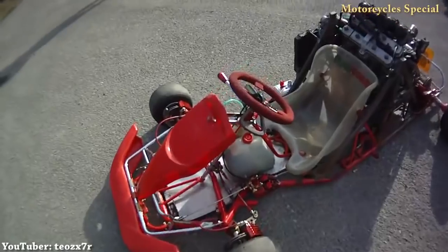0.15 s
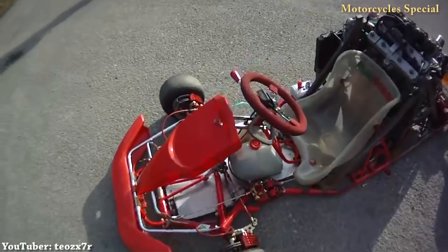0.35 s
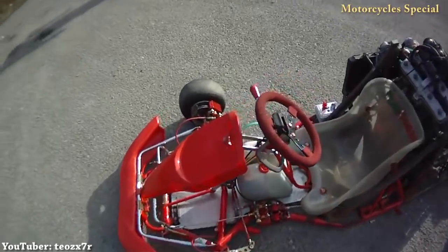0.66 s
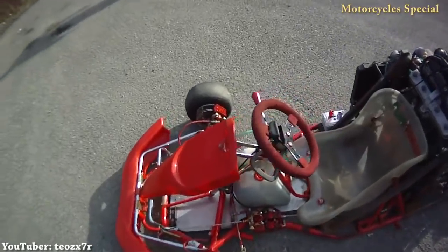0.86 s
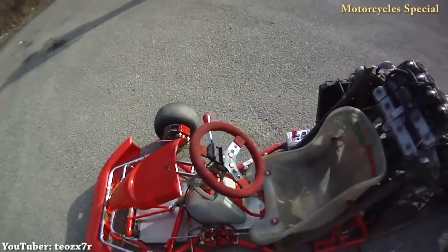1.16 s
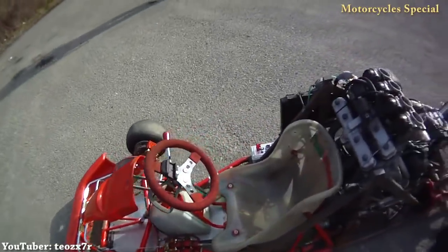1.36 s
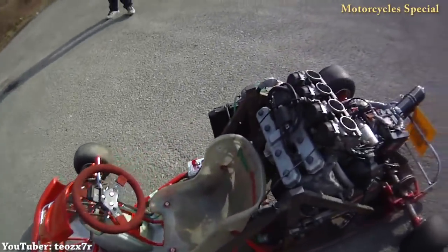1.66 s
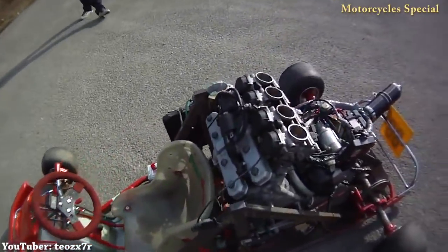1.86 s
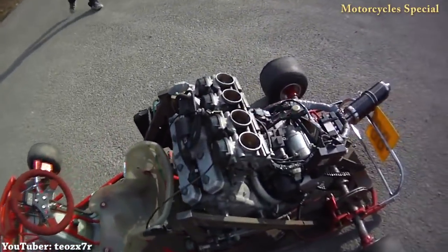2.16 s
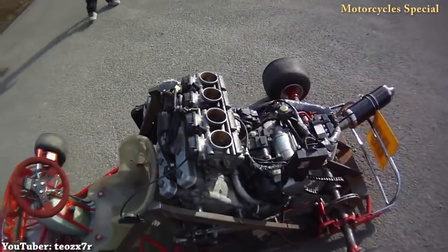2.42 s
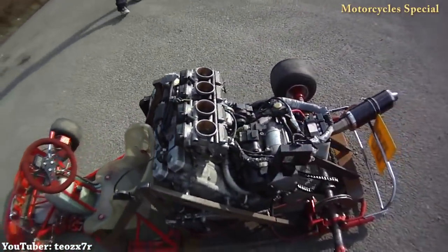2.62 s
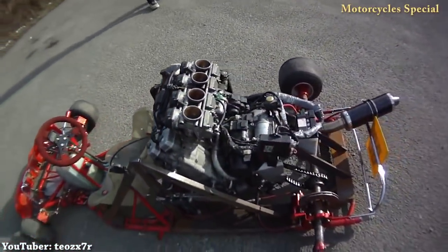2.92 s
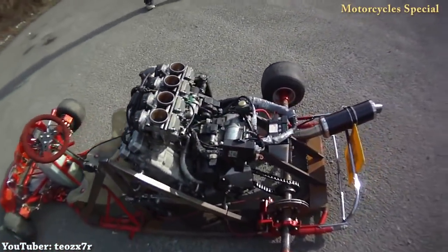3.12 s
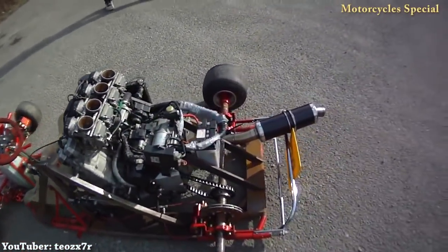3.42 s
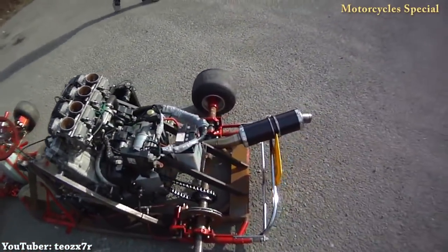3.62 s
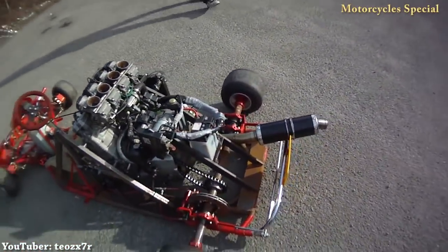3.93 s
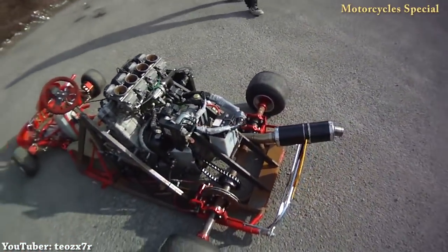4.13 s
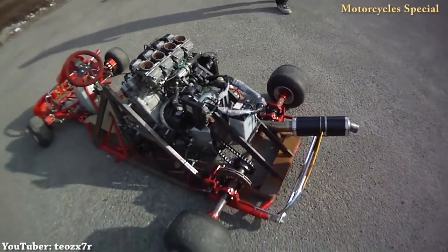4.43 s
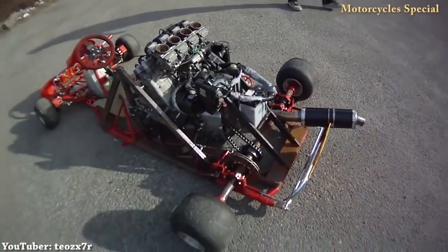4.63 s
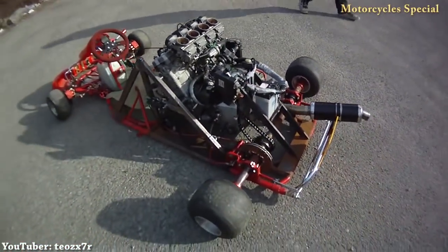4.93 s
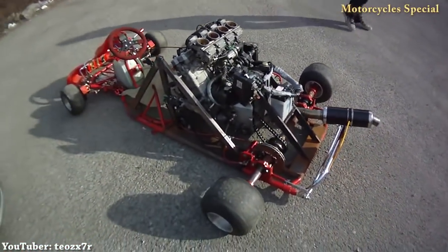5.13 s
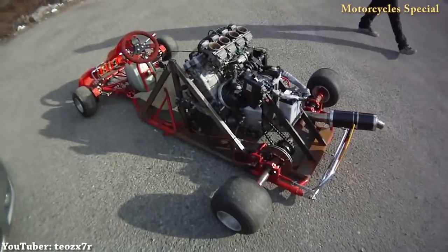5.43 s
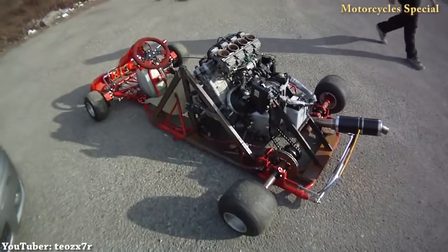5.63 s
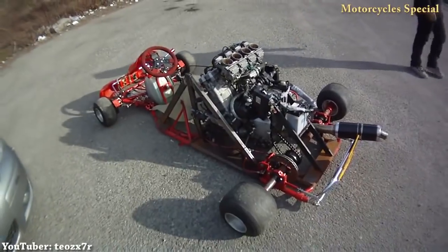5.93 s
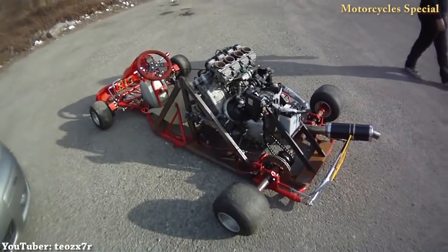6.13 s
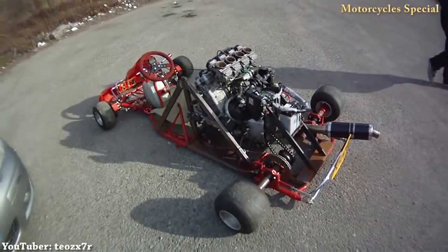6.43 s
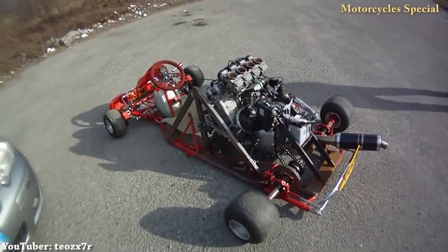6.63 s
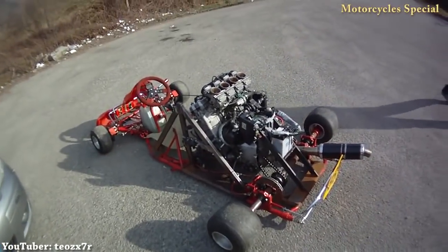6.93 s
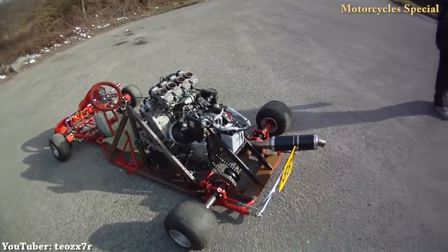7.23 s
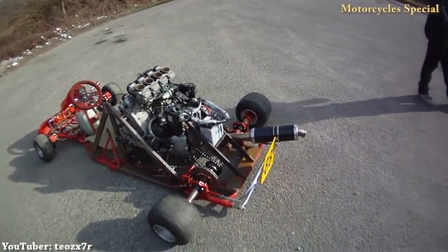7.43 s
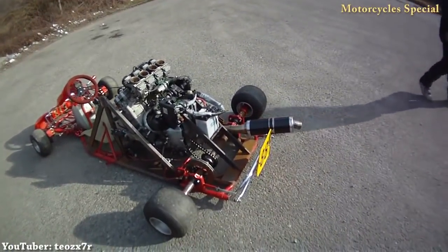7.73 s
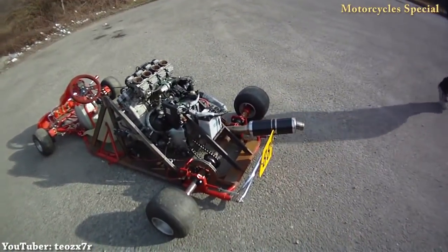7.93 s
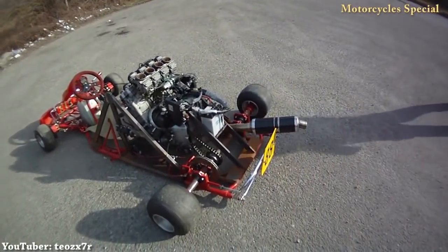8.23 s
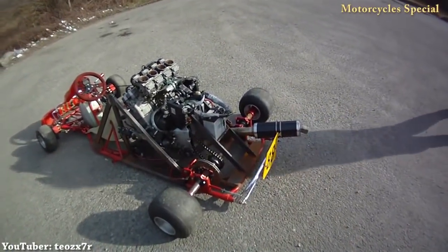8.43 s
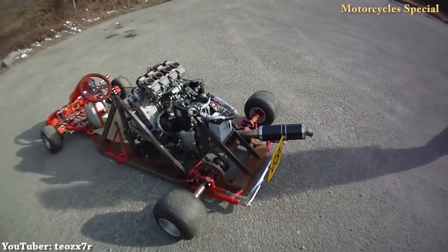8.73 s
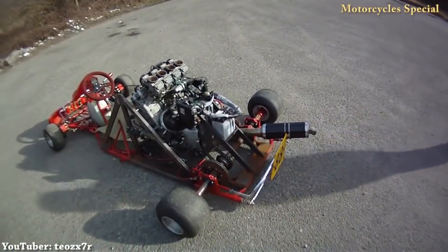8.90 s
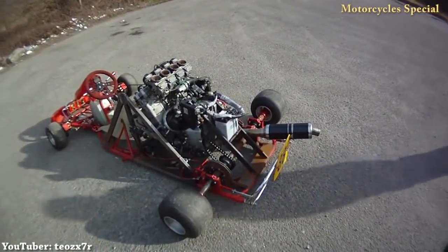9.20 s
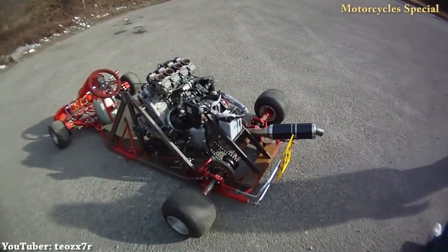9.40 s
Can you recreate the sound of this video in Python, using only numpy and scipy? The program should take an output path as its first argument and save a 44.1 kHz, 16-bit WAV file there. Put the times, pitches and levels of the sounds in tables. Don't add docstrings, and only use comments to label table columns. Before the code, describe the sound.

Rough, lumpy idle of a bare four-cylinder engine, low honking exhaust pulses under clattering cases and thin whines, heard while walking around it.

```python
import sys
import numpy as np
from scipy import signal
from scipy.fft import rfft, irfft, next_fast_len
from scipy.io import wavfile
from scipy.ndimage import uniform_filter1d

SR = 44100
rng = np.random.default_rng(int(sys.argv[2]) if len(sys.argv) > 2 else 0)


def unload_wav(signal):
    wavfile.write(
        sys.argv[1],
        SR,
        np.round(np.clip(np.atleast_2d(signal).T, -1, 1) * 32767).astype(np.int16),
    )


def boost_factor(decibels):
    exponent = np.asarray(decibels, float) / 20
    return 10 ** exponent


N = 421596
T = np.arange(N) / SR


def evened(x):
    return x / np.sqrt(np.mean(x ** 2) + 1e-20)


def coloured(x, points):
    size = next_fast_len(N)
    f_hz, db = np.transpose(points)
    log_f = np.log(np.fft.rfftfreq(size, 1 / SR) + 1)
    gain = boost_factor(np.interp(log_f, np.log(f_hz), db, -90, -90))
    return evened(irfft(rfft(x, size) * gain, size)[:N])


def resonate(x, hz, width_hz):
    turn = np.exp(2j * np.pi * np.cumsum(hz * np.ones(len(x))) / SR)
    r = np.exp(-np.pi * width_hz / SR)
    return 2 * (turn * signal.lfilter([1 - r], [1, -r], x / turn)).real


def drift(rate_hz):
    count = int(N / SR * rate_hz) + 2
    return evened(np.interp(T, np.linspace(0, N / SR, count), rng.standard_normal(count)))


def clicks(moments, sizes):
    train = np.zeros(N + SR)
    np.add.at(train, np.round((moments + .1) * SR).astype(int), sizes)
    return train


def whine(speed, multiple, width_hz, size=N):
    hz = multiple * speed
    once = resonate(rng.standard_normal(size), hz, width_hz)
    return evened(resonate(once, hz, width_hz))


# t/s, distance/m, bearing/deg (0 nose, 90 beside, 180 tail)
WALK = [(0, 1.71, 29.4), (.7, 1.52, 41.6), (1.2, 1.33, 46), (1.7, 1.24, 67.5), (2.2, 1.21, 72.3),
        (2.8, 1.13, 84.5), (3.3, 1.15, 90.6), (3.8, 1.19, 105), (4.2, 1.34, 116), (4.85, 1.47, 143.6),
        (5.5, 1.75, 147), (5.9, 1.8, 155), (6.3, 2.13, 151), (6.7, 1.97, 162), (7.7, 1.94, 186),
        (8.6, 2.15, 165), (9.3, 2.16, 147), (9.56, 2.2, 156)]


def walk(t):
    s, metres, bearing = np.transpose(WALK)
    return np.interp(t, s, metres), np.interp(t, s, bearing)


def heard(beam):
    db, dip_db, facing, spacing = beam
    t = T[::1000]
    metres, bearing = walk(t)
    off = (bearing - facing) / spacing
    return np.interp(T, t, db - 20 * np.log10(metres) - dip_db * np.sin(np.pi * off) ** 2)


FRONT_ENDS, BEHIND_STARTS = (37, 73.6), (86, 153)


def past(bearings):
    start, end = bearings
    return np.clip((walk(T)[1] - start) / (end - start), 0, 1)


# f/Hz, density/dB
YARD_COLOUR = [(12, -42), (20, -33), (161, -36), (215, -1), (277, 6), (387, 11), (440, -69), (900, -51),
               (1170, -59), (1980, -120)]
# t/s, length/s, level/dB, f/Hz, bandwidth/Hz
SCUFFS = [
    (.35, .09, -39, 60, 120),
    (.355, .05, -50, 1170, 90),
    (6.98, .18, -52, 1750, 800),
    (7.095, .1, -35, 380, 80),
    (7.095, .1, -36, 505, 60),
    (6.25, .05, -63, 9500, 2500),
]


def yard():
    out = boost_factor(-51) * coloured(rng.standard_normal(N), YARD_COLOUR)
    for s, length_s, db, hz, width_hz in SCUFFS:
        size = round(length_s * SR)
        noise = rng.standard_normal(12000)
        rub = resonate(resonate(noise, hz, width_hz), hz, width_hz)[:size]
        out[round(s * SR):][:size] += boost_factor(db) * evened(rub) * np.hanning(size)
    return out


# t/s, length/s, from f/Hz, to f/Hz, level/dB
CHIRPS = [
    (1.385, 0.26, 3800, 4220, -45.5),
    (3.548, 0.26, 4270, 4280, -47.5),
]


def chain_guide():
    out = np.zeros(N)
    for s, length_s, from_hz, to_hz, db in CHIRPS:
        along = np.clip(T[:SR // 2] / length_s, 0, 1)
        hz = from_hz + (to_hz - from_hz) * along
        line = whine(1, hz, 60, size=len(along))
        out[round(s * SR):][:len(along)] += boost_factor(db) * np.sin(np.pi * along) * line
    return out


# level at 1 m/dB, dip between lobes/dB, lobe bearing/deg, lobe spacing/deg
BRACKET_BEAM = (-48, 3.5, 35, 302)


def bracket(turns, speed):
    luck = boost_factor(2 * rng.standard_normal(200))[((turns - 1.4) // 4 + 2).astype(int)]
    swell = .25 + luck * (.5 + .5 * np.cos(np.pi / 2 * (turns - 3.4))) ** 2
    pump = boost_factor(-9) * whine(speed, 18.5, 22)
    buzz = evened(whine(1, 1145, 75) * swell) + pump
    return boost_factor(heard(BRACKET_BEAM) - 8.5) * buzz


# t/s, peak level/dB
CLACKS = [
    (2.06, -31),
    (2.132, -28),
    (2.205, -36),
    (2.501, -31),
    (2.644, -25),
    (4.901, -33),
]


def clacks():
    out = np.zeros(N)
    t = T[:300]
    for s, db in CLACKS:
        out[round(s * SR):][:len(t)] += boost_factor(db - 60 * t / .005) * np.sin(2 * np.pi * 1250 * t)
    return out


def patchy(x, db):
    z = signal.stft(x, nperseg=512)[2]
    field = rng.standard_normal(z.shape)
    for _ in range(2):
        field = uniform_filter1d(field, size=3, axis=0)
        field = uniform_filter1d(field, size=70, axis=1)
    return signal.istft(z * boost_factor(db * evened(field)), nperseg=512)[1][:N]


# f/Hz, density/dB
FRONT = [(330, 10), (560, -4), (766, -4), (914, -17.5), (1150, -7.5), (1410, -11), (1910, -22), (2340, -5),
         (2610, -7), (2750, -9.5), (3670, 1.5), (5080, -15.5), (13200, -27.5), (13900, -45), (14500, -58)]
BESIDE = [(330, 17.5), (560, -3), (878, -25), (1150, -13), (1510, -16), (2340, -0.5), (2610, -13.5),
          (2830, -4.5), (3620, -2), (4140, -2.5), (5370, -18.5), (6410, -13.5), (10000, -28), (11500, -25),
          (14500, -31)]
BEHIND = [(330, -4), (560, 0), (902, -17.5), (1030, -15), (1640, -19), (2370, -1.5), (2680, -12),
          (2910, -6), (4090, -4), (5370, -27.5), (6580, -15), (7650, -30.5), (11700, -31), (13700, -33),
          (14500, -59)]


def case_rattle(front, behind):
    noise = rng.standard_normal((3, N))
    later = np.sqrt(1 - behind) * coloured(noise[0], BESIDE) + np.sqrt(behind) * coloured(noise[1], BEHIND)
    return patchy(np.sqrt(front) * coloured(noise[2], FRONT) + np.sqrt(1 - front) * later, 1.9)


# f/Hz, level/dB
TICK_COLOUR = [(4500, -2), (5400, -7), (6400, 5), (7400, -10.5), (8300, -5.5), (10200, -18.5), (11500, -10),
               (14000, -42)]
# place in cycle/firings, level/dB
VALVES = [
    (.72, 7),
    (1.72, 0),
    (2.72, 6.5),
    (3.72, 3),
]


def valve_ticks(turns):
    cycle = (turns // 4 + 2).astype(int)
    luck = boost_factor(1.6 * rng.standard_normal((200, len(VALVES))))[cycle]
    shut = 0
    for k, (at, db) in enumerate(VALVES):
        shut = shut + boost_factor(db) * luck[:, k] * np.exp(-((turns - at) % 4) / 0.42)
    return evened(coloured(rng.standard_normal(N), TICK_COLOUR) * uniform_filter1d(shut, size=260))


TEETH = [37, 39.5, 41.5, 46, 55.5, 58, 61, 68, 71.5, 74, 77.5]


def teeth(turns):
    waver = 1.55 * np.sin(np.pi / 2 * turns)
    spin = uniform_filter1d(turns, size=1500)
    out = 0
    for order in TEETH:
        level = boost_factor(2.2 * drift(5) + 3.0 * drift(30))
        out = out + level * np.sin(2 * np.pi * order * spin + waver + 2.5 * drift(40))
    return evened(out)


# multiple of firing rate, bandwidth/Hz
WHINES = [
    (51.8, 45),
    (64.8, 62),
]
# level at 1 m/dB, dip between lobes/dB, lobe bearing/deg, lobe spacing/deg
METAL_BEAMS = [
    (-34, 2.15, 116, 260),
    (-47.5, 3.7, 190, 230),
    (-39, 20, 75.6, 121),
    (-39, 3, 74, 250),
    (-40, 7.2, 70, 90),
]


def metal(turns, speed, moments, loss_db):
    rattle_db, tick_db, cover_db, low_db, high_db = map(heard, METAL_BEAMS)
    shove = boost_factor(0.08 * np.interp(T, moments, loss_db) + 0.67 * drift(25))
    behind = .05 + .85 * past(BEHIND_STARTS)
    front = .9 * (1 - past(FRONT_ENDS))
    rattle = case_rattle(front, behind)
    half = 1 + .6 * np.cos(np.pi / 2 * (turns - 3.3))
    throb = resonate(rattle, 2250 + 110 * np.sin(np.pi / 2 * turns), 420)
    rattle = rattle + (half ** 1.1 - 1) * throb
    cover = evened(whine(1, 2398, 35) * half ** .6)
    low, high = (whine(speed, *mesh) for mesh in WHINES)
    out = boost_factor(rattle_db - 2.0) * rattle * half ** 0.022
    out += boost_factor(tick_db - 2.5 - 5.2 * front) * valve_ticks(turns)
    out += boost_factor(cover_db - 6.5) * cover
    out += boost_factor(rattle_db - 13.0) * teeth(turns)
    out += boost_factor(low_db - 9.5 + 1.4 * drift(9)) * low
    out += boost_factor(high_db - 2.5 - 3.6 * behind) * high
    return shove * out


# t/s, speed/(firings/s)
SPEED = [(0.0, 55.116), (0.89, 53.646), (1.09, 55.888), (2.04, 55.545), (2.23, 54.115), (3.09, 55.472),
         (3.28, 56.832), (3.72, 55.268), (3.92, 56.349), (5.23, 55.944), (5.47, 53.318), (5.81, 55.469),
         (6.31, 53.687), (7.73, 55.759), (7.91, 57.505), (8.96, 54.574), (9.15, 56.683), (9.56, 54.141)]
# first t/s, last t/s, first
# loss/dB, last loss/dB
STUMBLES = [(0.134, 0.134, -25, -25), (0.355, 0.355, -8, -8), (0.647, 0.946, -12, -5),
            (0.964, 0.964, -9, -9), (1.234, 1.376, -13, -17), (1.593, 1.88, -19, -9),
            (1.809, 1.952, -14, -16), (2.096, 2.242, -7, -15), (2.391, 2.537, -7, -20),
            (2.755, 2.901, -17, -6), (3.046, 3.046, -15, -15), (3.278, 3.278, -13, -13),
            (3.331, 3.473, -10, -6.6), (3.616, 3.904, -15, -8), (4.046, 4.188, -17, -23),
            (4.329, 4.615, -14, -6), (4.9, 5.329, -7, -34), (5.626, 5.626, -23, -23),
            (5.644, 5.644, -15, -15), (5.773, 6.062, -7, -17), (6.284, 6.284, -15, -15),
            (6.581, 6.581, -14, -14), (6.949, 7.24, -13, -9), (7.386, 7.386, -28, -28),
            (7.602, 7.602, -24, -24), (8.026, 8.168, -14, -13), (8.114, 8.114, -9, -9),
            (8.539, 8.539, -11, -11), (8.664, 8.811, -8, -13), (9.102, 9.388, -8, -9)]


def crank():
    lead = SR // 10
    turns_at_start, lean_db, carry = -1.396, 0.98, 0.065
    sag_rate, recover_s, wander_rate = 3.2, 0.066, 0.386
    t = np.arange(-lead, N + lead) / SR
    turns = np.cumsum(np.interp(t, *np.transpose(SPEED))) / SR
    turns = turns - turns[lead] + turns_at_start
    firing = np.arange(-4, int(turns[-1]))
    moments = np.interp(firing, turns, t)
    loss_db = -lean_db * rng.exponential(1, len(firing)) * (firing % 4 == 2)
    for first_s, last_s, first_db, last_db in STUMBLES:
        first, last = np.argmin(abs(moments - first_s)), np.argmin(abs(moments - last_s))
        run = np.arange(first, last + 1, 8)
        loss_db[run] = np.linspace(first_db, last_db, len(run))
    loss_db = np.minimum(loss_db, carry * np.roll(loss_db, 1))
    lost = clicks(moments, 1 - boost_factor(loss_db))[:len(t)]
    sag = sag_rate * signal.lfilter([1], [1, -np.exp(-1 / (recover_s * SR))], lost)
    sag = sag + wander_rate * np.interp(t, T, drift(12))
    turns = turns - np.cumsum(sag - uniform_filter1d(sag, size=SR // 3)) / SR
    moments = np.interp(firing, turns, t)
    return turns[lead:][:N], firing, moments, loss_db


CYLINDER_DB = [-0.2, 0.19, -0.59, 0.34]
# f/Hz, bandwidth/Hz, share of a firing's loss, level/dB, row of PIPE_BEAMS
PIPES = [
    (82, 56.6, 0.35, -2.5, 0),
    (154.5, 122.5, 0.79, 2, 0),
    (306.4, 206.4, 0.57, -7, 1),
    (281, 118.6, 1.54, -6, 1),
    (364, 160, 1, -6.5, 2),
    (520, 52.5, 3.2, -3, 3),
    (602, 81, 0.88, -18, 4),
]
RISE = [1.7, 1.6, 1.35, .45, 1.3, 1.2, 1.2]
# level at 1 m/dB, dip between lobes/dB, lobe bearing/deg, lobe spacing/deg
PIPE_BEAMS = [
    (-32.5, 8.5, 204, 360),
    (-21.5, 9, 39, 323),
    (-31.5, 12.5, 77, 106.5),
    (-40, 22, 66.6, 73),
    (-33.5, 11.5, 149, 160),
]


def pipes(firing, moments, loss_db):
    chance = rng.standard_normal((len(firing), 9))
    habit_db = np.array(CYLINDER_DB)[firing % 4]
    t, out = T[:3000], 0
    for k, (hz, width_hz, share, db, row) in enumerate(PIPES):
        rise_s = RISE[k] * 2 / (np.pi * width_hz)
        size_db = habit_db + share * loss_db + 0.62 * chance[:, 0] + .5 * chance[:, 2 + k]
        start = moments - rise_s + .00004 * chance[:, 1]
        ring = -t ** 2 * np.exp(-np.pi * width_hz * t) * np.cos(2 * np.pi * hz * (t - rise_s))
        mode = signal.oaconvolve(clicks(start, boost_factor(size_db)), ring)[SR // 10:][:N]
        out = out + boost_factor(db + heard(PIPE_BEAMS[row])) * evened(mode)
    return out


# from t/s, rise/s, delay/s, level/dB, f/Hz, bandwidth/Hz
ECHO = (8.65, .25, .009, -1, 365, 130)
# share, f/Hz, bandwidth/Hz
SHADE = (.35, 280, 70)


def passer_by(x):
    s, rise_s, delay_s, db, hz, width_hz = ECHO
    share, shade_hz, shade_width_hz = SHADE
    back = np.roll(resonate(x, hz, width_hz), round(delay_s * SR))
    shaded = share * resonate(x, shade_hz, shade_width_hz)
    return x - np.clip((T - s) / rise_s, 0, 1) * (boost_factor(db) * back + shaded)


def scene():
    turns, firing, moments, loss_db = crank()
    speed = uniform_filter1d(np.gradient(turns) * SR, SR // 9)
    out = yard() + chain_guide() + bracket(turns, speed) + clacks()
    out += metal(turns, speed, moments, loss_db)
    out += passer_by(pipes(firing, moments, loss_db))
    return out[None]


def band_limit(x):
    return signal.sosfilt(signal.butter(12, 14650, fs=SR, output="sos"), x)


def record(dry):
    cut = signal.sosfilt(signal.butter(2, 35, "high", fs=SR, output="sos"), dry)
    lowpass = signal.firwin(801, 13900, window=("kaiser", 10), fs=SR)
    low = signal.oaconvolve(cut, lowpass[None], "same")
    is_open = 1. * (drift(35) > .9 * walk(T)[0] + past(FRONT_ENDS[::-1]))
    burst = uniform_filter1d(is_open, size=400)
    return band_limit(low + burst * (cut - low))


dry = scene()
out = record(dry)
unload_wav(out)
```